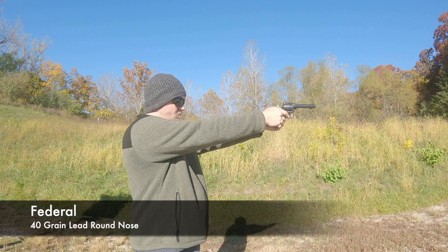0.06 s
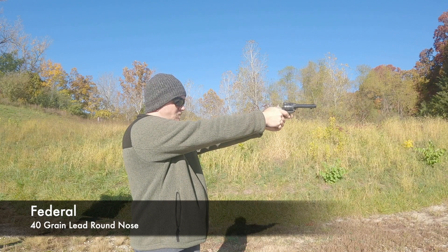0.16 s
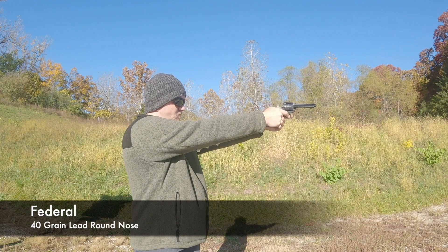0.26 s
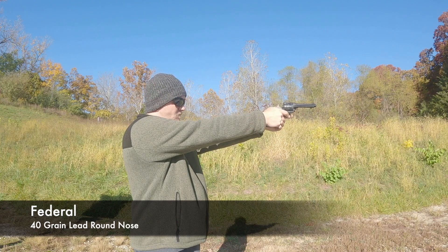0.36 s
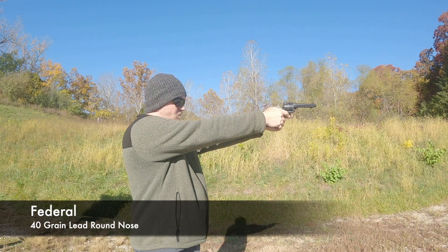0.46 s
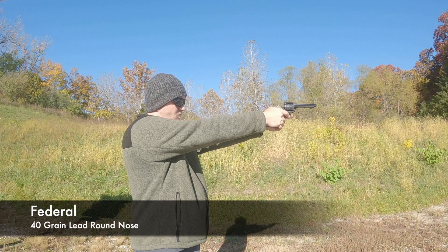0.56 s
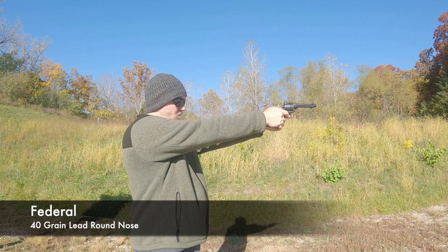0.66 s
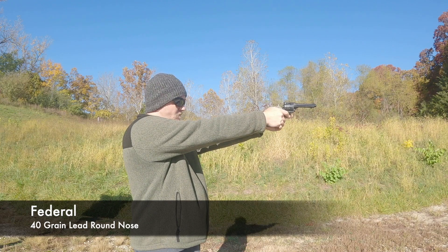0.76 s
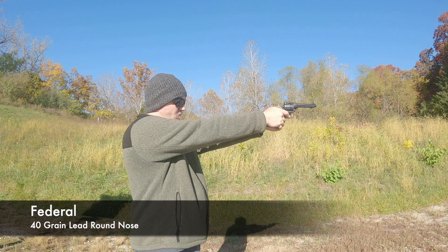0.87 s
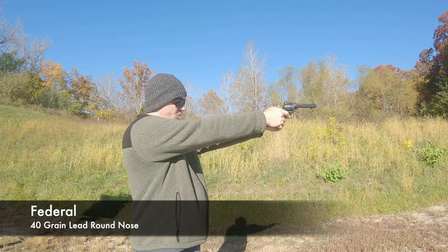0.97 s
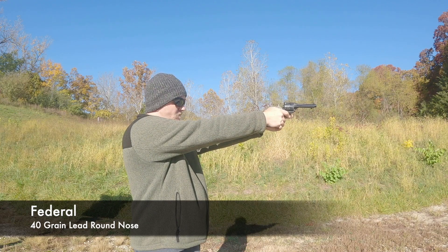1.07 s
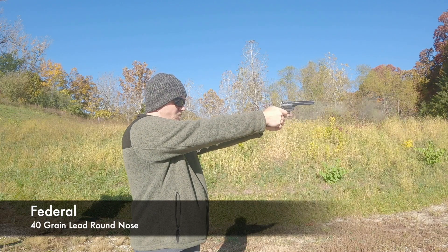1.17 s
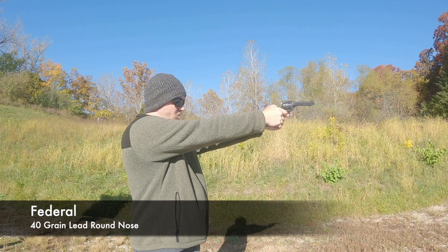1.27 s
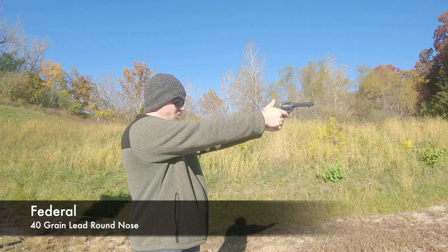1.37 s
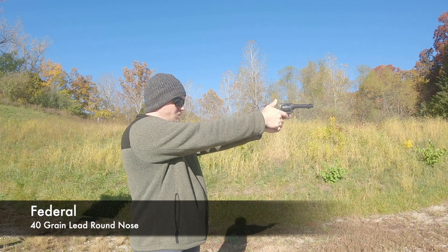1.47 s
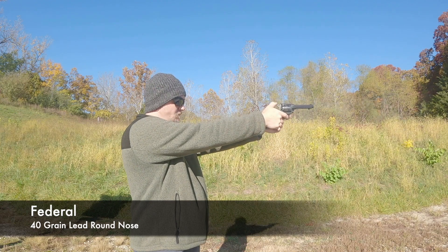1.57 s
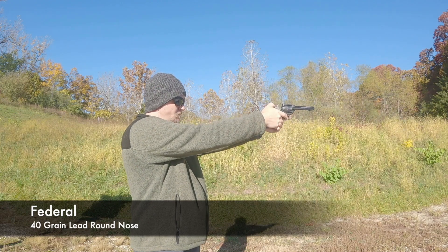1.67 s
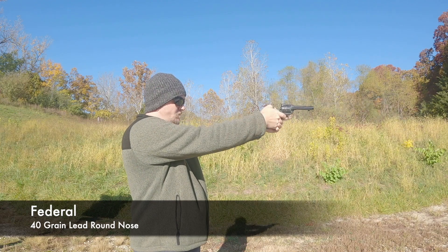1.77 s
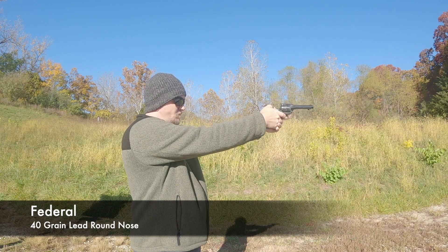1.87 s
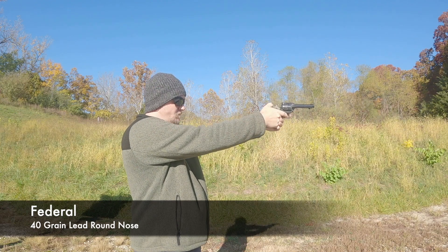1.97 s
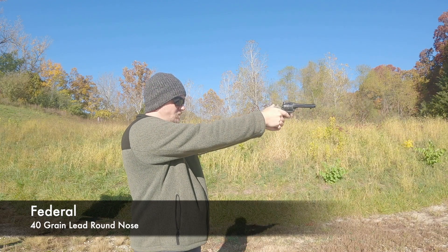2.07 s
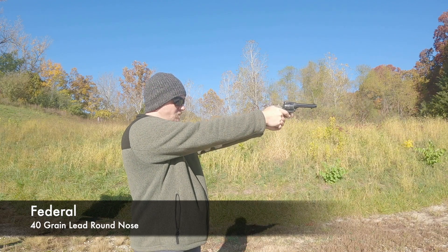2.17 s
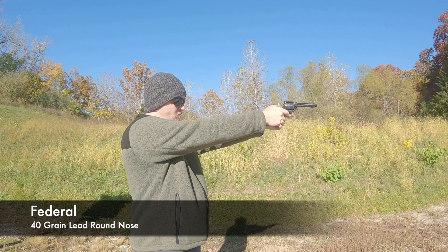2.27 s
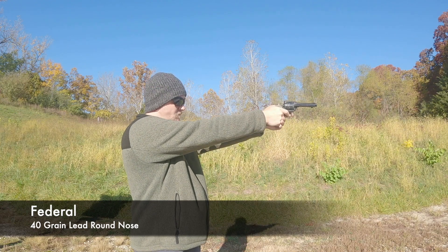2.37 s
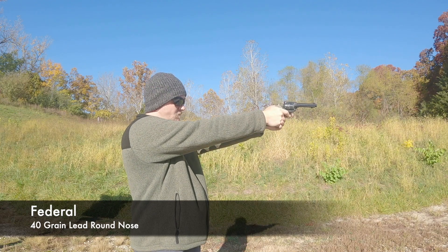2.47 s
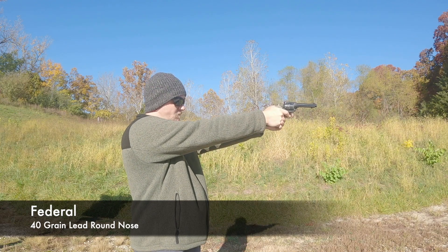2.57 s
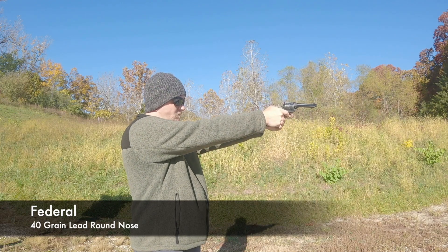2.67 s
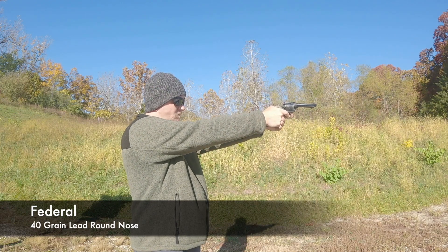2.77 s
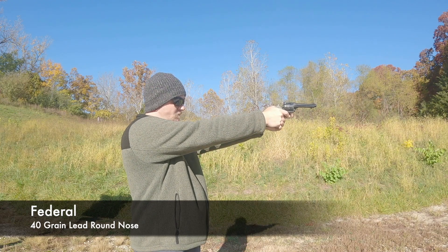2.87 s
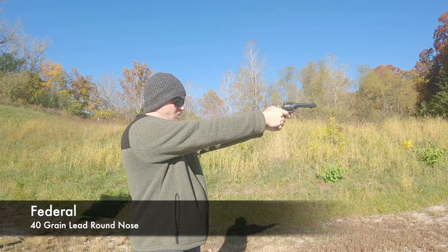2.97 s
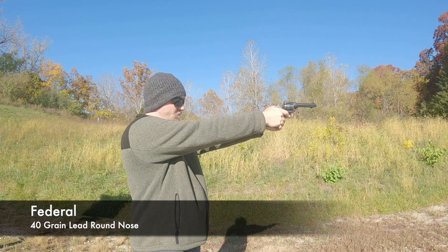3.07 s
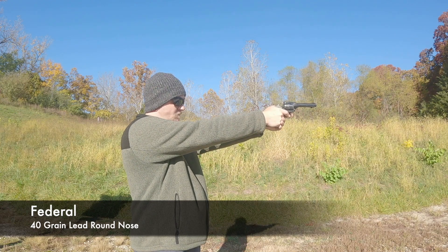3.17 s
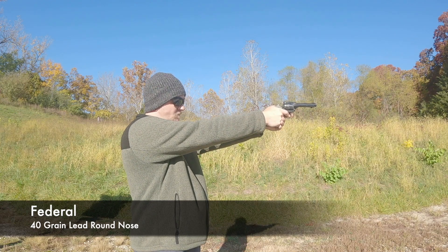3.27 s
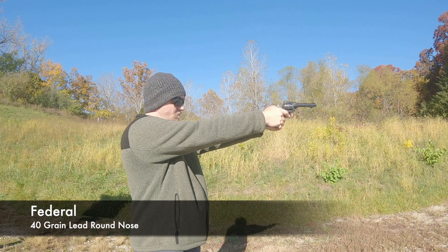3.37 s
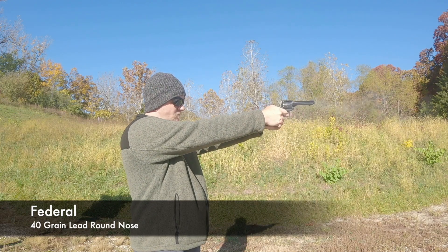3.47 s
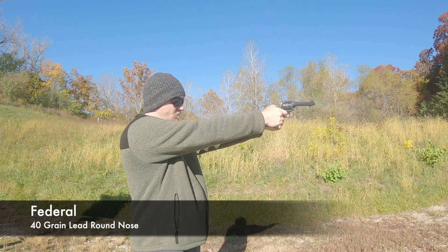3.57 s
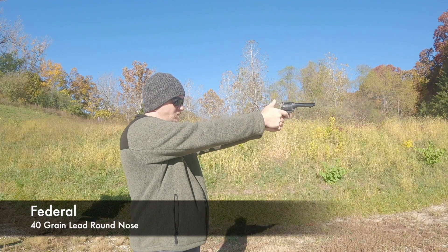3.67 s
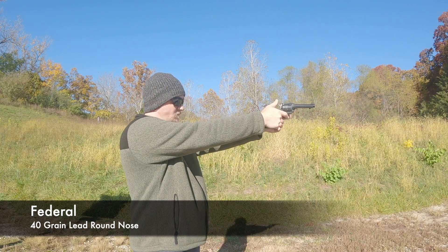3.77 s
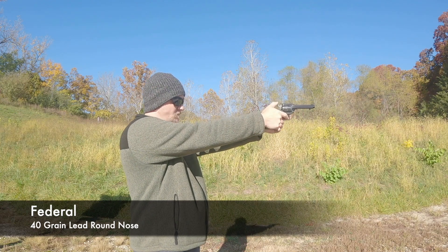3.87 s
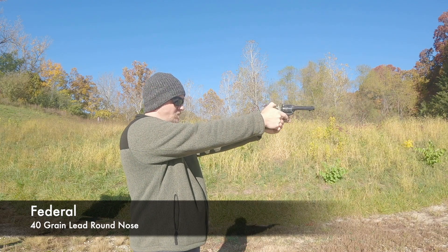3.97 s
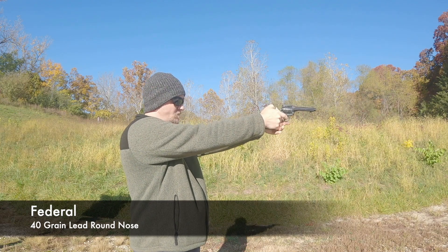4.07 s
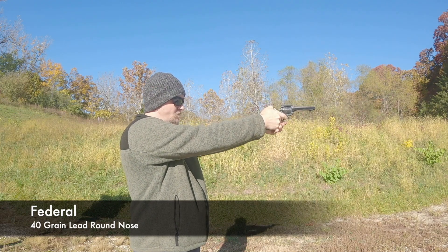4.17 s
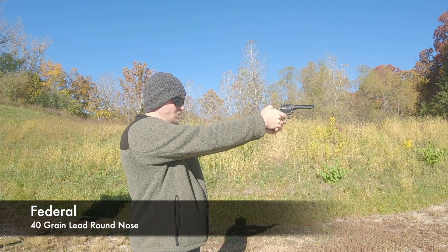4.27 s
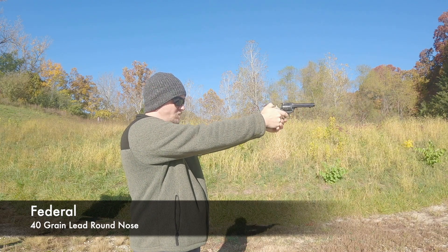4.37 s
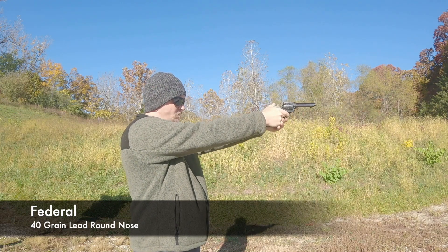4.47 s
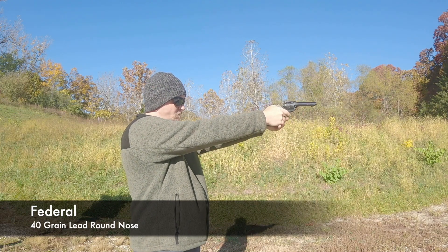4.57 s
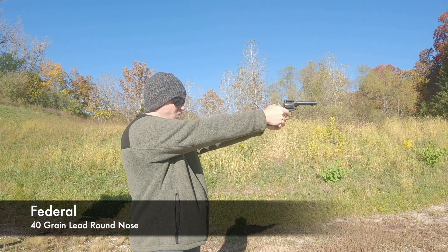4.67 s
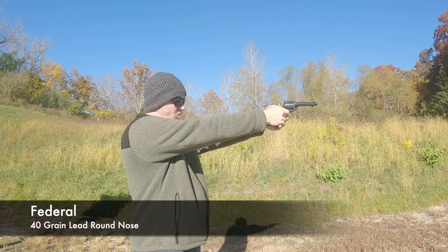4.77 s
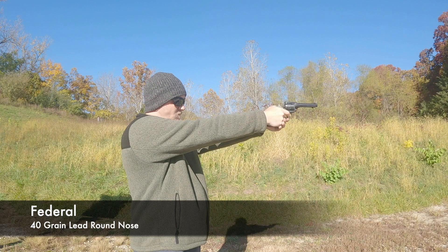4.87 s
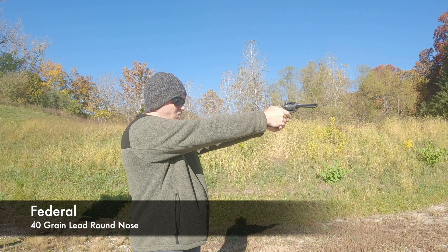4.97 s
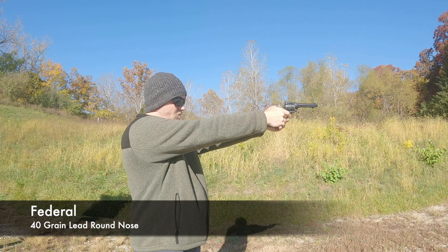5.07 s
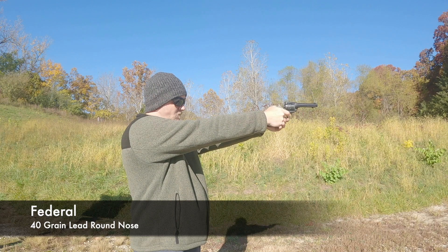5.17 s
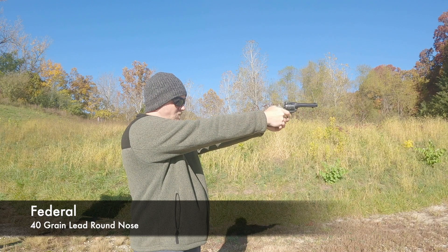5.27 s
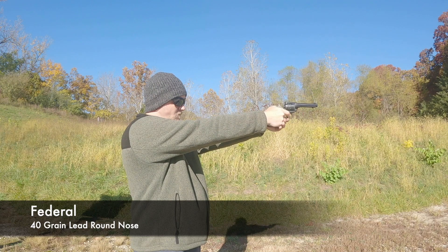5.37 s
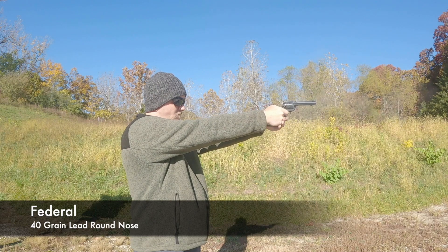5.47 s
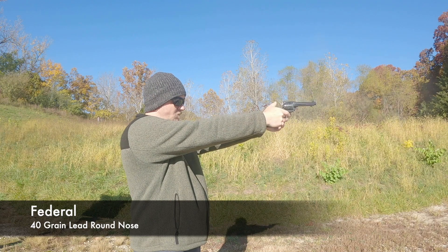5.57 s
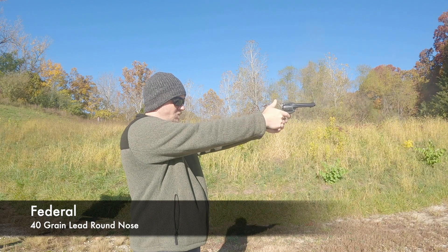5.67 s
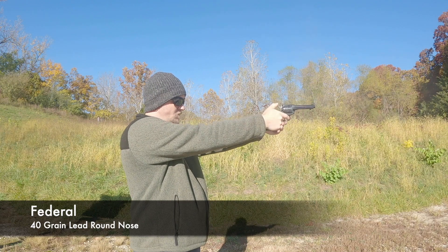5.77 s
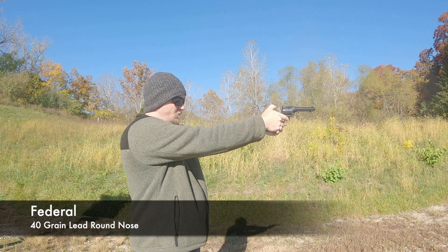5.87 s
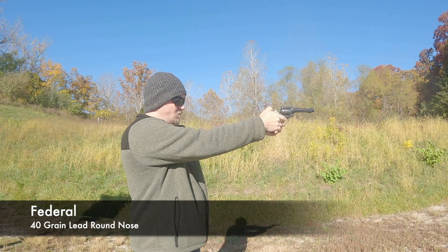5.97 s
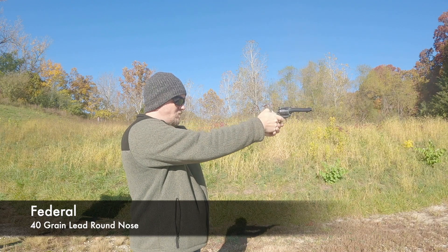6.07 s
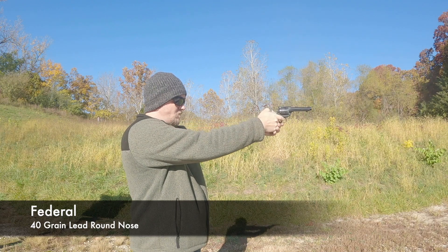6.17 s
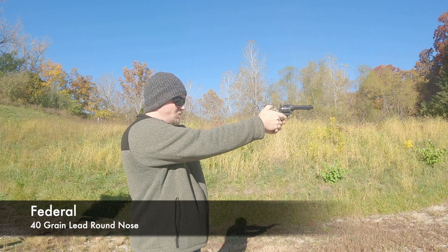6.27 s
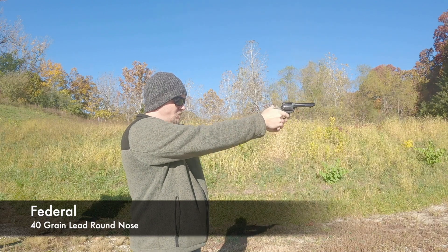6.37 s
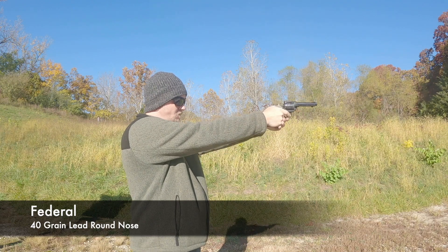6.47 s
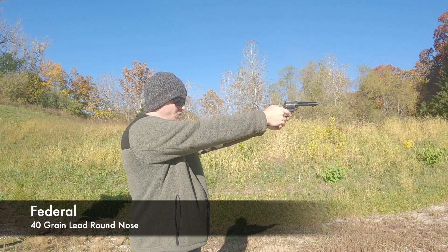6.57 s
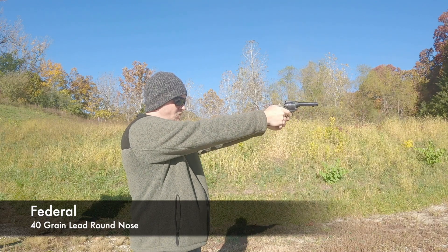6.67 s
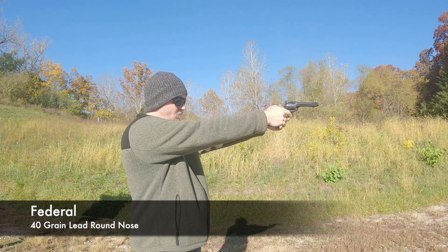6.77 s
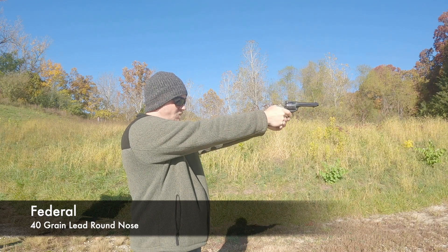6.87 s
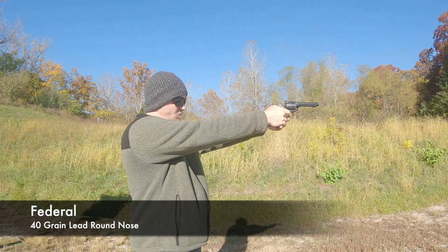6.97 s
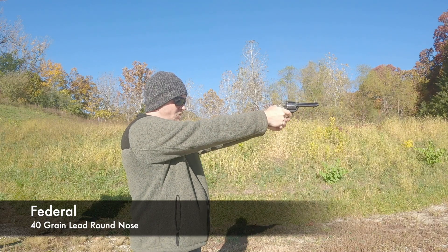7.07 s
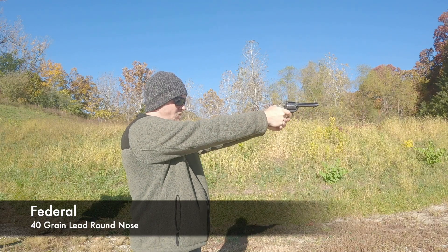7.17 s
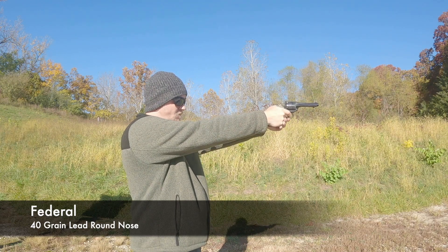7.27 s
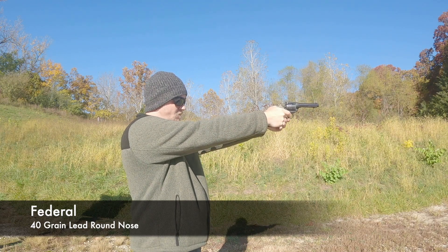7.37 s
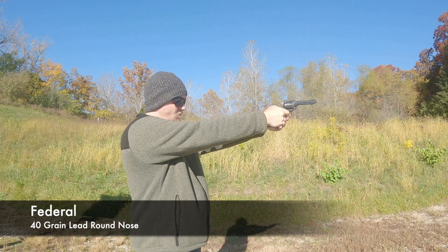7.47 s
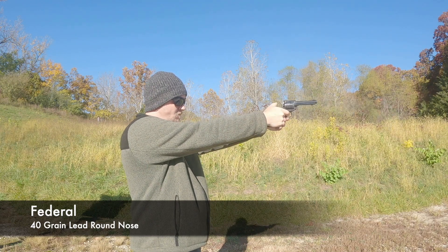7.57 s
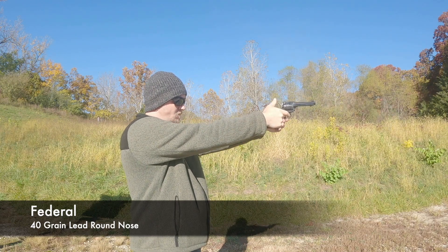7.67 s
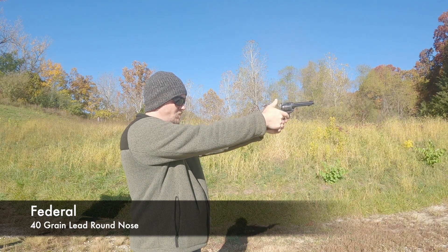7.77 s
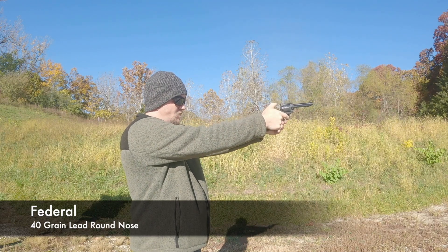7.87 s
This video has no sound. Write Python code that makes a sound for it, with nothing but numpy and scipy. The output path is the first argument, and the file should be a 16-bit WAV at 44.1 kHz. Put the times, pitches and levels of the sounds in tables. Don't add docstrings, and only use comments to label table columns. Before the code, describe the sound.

Close phone pickup in an open meadow, with an earth bank and tree line beyond. At 0 s an earlier shot's echo is dying away beneath faint high cricket whistles, soft rustle and distant traffic hum. Small-revolver blasts hit at 1.2, 3.5, 5.5 and 7.5 s: very loud, short, clipped cracks with a brief low boom and a gritty smear just before each. About 0.14 s later comes a bank slap and bullet strike, mostly a dull thump after the second shot and sharpest after the third. Tree echo swells around a quarter second after each blast, then rolls away, losing treble. Tiny steel cocking clicks come at 1.6-2.0, 4.0-4.4 and 5.9-6.3 s, with a faint one near 7.9. Crickets trill most around 3.5 s; a high buzz rises near 5.5 and 7.4 s. The final echo is cut off around 7.9 s.

```python
import sys
import numpy as np
from scipy import signal
from scipy.fft import rfft, irfft, next_fast_len
from scipy.io import wavfile
from scipy.ndimage import uniform_filter1d, map_coordinates

SR = 44100
rng = np.random.default_rng(int(sys.argv[2]) if len(sys.argv) > 2 else 0)


def unload_wav(signal):
    wavfile.write(
        sys.argv[1],
        SR,
        np.round(np.clip(np.atleast_2d(signal).T, -1, 1) * 32767).astype(np.int16),
    )


def linear_from_db(decibels):
    return 10 ** (np.asarray(decibels, float) / 20)


N = 348831


def unit(x):
    return x / np.sqrt(np.mean(x ** 2) + 1e-20)


def along(points, hz):
    f, v = np.transpose(points)
    return np.interp(np.log(hz + 1), np.log(f + 1), v)


def filtered(x, response):
    m = next_fast_len(x.shape[-1] + 8192)
    return irfft(rfft(x, m) * response(np.fft.rfftfreq(m, 1 / SR)), m)[..., :x.shape[-1]]


def ring(t, hz, t60, attack):
    t = np.maximum(t, 0)
    return np.sin(2 * np.pi * hz * t) * linear_from_db(-60 * t / t60) * (1 - np.exp(-t / attack))


def add(track, sound, s):
    at = round(s * SR)
    part = sound[max(-at, 0):max(len(track) - at, 0)]
    track[max(at, 0):][:len(part)] += part


def wobble(rate):
    knots = rng.standard_normal(int(N * rate / SR) + 4)
    return map_coordinates(knots, [np.arange(N) * rate / SR])


# (pitch [Hz], density [dB per Hz])
AIR_TONE = [(60, -44), (110, -31.5), (167, -11), (291, -13.5), (400, -5), (688, -1), (1350, -9),
            (2500, -16.5), (4850, -29), (6500, -29.5), (8000, -32), (8500, -52.5), (10900, -45),
            (15500, -60.5)]


def air():
    hum = filtered(rng.standard_normal(N), lambda hz: linear_from_db(along(AIR_TONE, hz)))
    return linear_from_db(-59 + 0.74 * wobble(3)) * unit(hum)


# (start [s], end [s])
WHISTLE_TIMES = [(-.15, .495), (.45, .76), (.68, 1.02), (.97, 1.2), (2.47, 2.98), (2.95, 3.3), (3.25, 3.46),
                 (4.26, 4.81), (4.8, 5.2), (4.86, 5.17), (5.3, 5.44), (6.78, 7.09)]
# (pitch [Hz], scoop from below [Hz], level [dB])
WHISTLE_NOTES = [(7200, 20, -75), (7300, 350, -75), (7230, 500, -71.5), (7150, 560, -68), (7340, 400, -72),
                 (7280, 950, -70), (7060, 500, -69.5), (7150, 120, -78.5), (7140, 90, -68),
                 (7550, 400, -75), (7150, 350, -73), (7400, 900, -75)]


def whistles():
    settle, sag_hz_per_s = 0.31, 350
    hook_hz, hook_s = 300, .015
    swell_db, swell_share = 14, 0.49
    out = np.zeros(N)
    flutter, waver = linear_from_db(3.0 * wobble(60)), 14 * wobble(120)
    for (start, end), (hz, scoop, db) in zip(WHISTLE_TIMES, WHISTLE_NOTES):
        length = end - start
        u = np.arange(round(length * SR)) / SR
        hook = hook_hz * np.exp((u - length) / hook_s) * (scoop < 100)
        pitch = hz - scoop * np.exp(-u / (settle * length)) - sag_hz_per_s * u - hook
        pitch = pitch + waver[round(abs(start) * SR):][:len(u)]
        level_db = db - swell_db * np.clip(1 - u / (swell_share * length), 0, 1)
        edge = np.clip(np.minimum(u, length - u) / .012, 0, 1)
        note = np.sin(2 * np.pi * np.cumsum(pitch) / SR)
        add(out, np.sqrt(2) * edge * linear_from_db(level_db) * note, start)
    t = np.arange(SR // 4) / SR
    tail = rng.standard_normal(SR // 4) * linear_from_db(-60 * t / .3)
    blur = signal.fftconvolve(out * unit(wobble(500)), tail / np.linalg.norm(tail))[:N]
    return out * flutter + linear_from_db(-5) * blur


# (time [s], level [dB])
TRILL_LEVEL = [(0, -95), (1.1, -80), (2.0, -85), (3.45, -74.5), (4.3, -85), (4.6, -84.5), (6.3, -95.5),
               (7.4, -85)]
# (time [s], level [dB])
BUZZ_LEVEL = [(0, -103), (2.2, -107), (4.3, -104), (5.45, -82.5), (6.3, -95.5), (7.4, -79.5), (7.91, -86.5)]


def crickets():
    trill_hz, trill_at_s = 27.37, 2.417
    t = np.arange(N) / SR
    chirps = np.exp(3.5 * (np.cos(2 * np.pi * trill_hz * (t - trill_at_s)) - 1)) * linear_from_db(3.5 * wobble(10))
    teeth = 1 + .7 * np.cos(2 * np.pi * 300 * t)
    wing = np.sin(2 * np.pi * np.cumsum(7500 + 75 * wobble(300)) / SR)

    def bands(hz):
        main = np.exp(-((hz - 11200) / 600) ** 2)
        upper = .4 * np.exp(-((hz - 12700) / 400) ** 2)
        return main + upper + .25 * np.exp(-((hz - 9600) / 600) ** 2)

    buzz = filtered(rng.standard_normal(N), bands)
    trill_db = np.interp(t, *np.transpose(TRILL_LEVEL))
    buzz_db = np.interp(t, *np.transpose(BUZZ_LEVEL))
    song = whistles() + linear_from_db(trill_db) * unit(chirps * teeth * wing)
    return song, linear_from_db(buzz_db + 2 * wobble(25)) * unit(buzz)


# (pitch [Hz], density [dB per Hz])
TREE_TONE = [(110, -52.5), (166, -27.5), (252, -12), (382, -4), (635, -2.5), (850, -5), (1400, -6),
             (3400, -6.5), (4500, -12.5), (7170, -22.5), (8600, -34.5), (9500, -41.5), (11500, -46),
             (14500, -62)]


def foliage(noise, share):
    return filtered(noise, lambda hz: np.sqrt(share(hz)) * linear_from_db(along(TREE_TONE, hz)))


# (delay [s], level [dB], swell [dB/s], fade [dB/s], bass [dB])
BELTS = [(.02, -10, 600.5, 351.5, 10), (.07, -26.5, 198, 25, 18), (.16, -14, 400, 31.5, 9),
         (.215, -4.5, 200, 47, -5), (.27, 1.5, 151.5, 63, -6), (.5, -8.5, 50.5, 18.5, -8.5),
         (1.05, -15, 18.5, 18, -12.5)]
# (full below [Hz], gone above [Hz])
BELT_BASS = (220, 650)


def landscape(noise):
    air_loss_db, loss_slope = 4.5, 1.15
    tree_line_s, ragged_db = 0.23, 1.92
    hz, t, z = signal.stft(noise, SR, nperseg=256)
    full, gone = BELT_BASS
    bass = np.clip(np.log(gone / (hz + 1)) / np.log(gone / full), 0, 1.3)[:, None]
    power = 0
    for at, db, swell, fall, bass_db in BELTS:
        drop_db = np.maximum(swell * (at - t), fall * (t - at))
        power = power + linear_from_db(db + bass_db * bass - drop_db) ** 2
    loss_db = air_loss_db * (np.minimum(hz, 7000)[:, None] / 1000) ** loss_slope * (t - tree_line_s)
    fade = np.interp(t, [.008, .02, 1.8, 2.3], [0, 1, 1, 0])
    clumps = uniform_filter1d(rng.standard_normal(z.shape), size=5, axis=0)
    ragged = unit(uniform_filter1d(clumps, size=12, axis=1))
    z = z * np.sqrt(power) * linear_from_db(ragged_db * ragged - loss_db) * fade
    return signal.istft(z, SR, nperseg=256)[1][:len(noise)]


# (delay [s], level [dB], pitch [Hz])
BANKS = [(.05, -52, 300), (.085, -37.5, 300), (.135, -44, 330), (.17, -42.5, 130.7), (.184, -32, 324.6),
         (.222, -33.5, 550), (.26, -23.5, 642), (.354, -26.5, 835), (.455, -31, 750), (.51, -38.5, 490),
         (.633, -43, 608), (.741, -40.5, 536), (.782, -44, 490), (.845, -39.5, 550), (1.011, -38.5, 590),
         (1.037, -41, 640), (1.078, -39.5, 550), (1.159, -42, 656), (1.201, -42.5, 586)]


def banks(length):
    out, t = np.zeros(length), np.arange(SR // 20) / SR
    mounds = [(0.32 + u, -52.5 - 27 * u + 4 * (v - .5), 298 * (0.84 + 0.4 * v))
              for u, v in rng.random((14, 2))]
    for delay, db, hz in BANKS + mounds:
        add(out, linear_from_db(db + 12.5) * ring(t, hz, 9 / hz, 1.0 / hz), delay - .004)
    return filtered(out, lambda hz: hz ** 4 / (hz ** 4 + 115 ** 4))


# (time to blast [s], level [dB])
EARLY = [(-.043, -35), (-.032, -23), (-.021, -9), (-.011, -5), (-.001, -5), (.001, -30)]


def smear(x):
    block, out = 512 / 48000, np.zeros(SR // 16)
    t = np.arange(len(out)) / SR - 4 * block
    for k in range(4):
        add(out, (-1) ** k * x, k * block)
    lift = 1 + 1.4 * np.clip(((t / block) % 1 - .26) / 0.033, 0, 1)
    grit = filtered(rng.standard_normal(len(t)), lambda hz: (
        0.59 / np.sqrt(1 + (hz / 900) ** 2) + 0.52 * np.exp(-((hz - 8800) / 400) ** 2)))
    bass = filtered(out, lambda hz: 1 / (1 + (hz / 1100) ** 4))
    fade = linear_from_db(np.interp(t, *np.transpose(EARLY), right=-120))
    copies = (out + bass * (lift - 1) + grit) * fade
    lead = 64
    dull = filtered(np.pad(copies, lead), lambda hz: (
        1 / np.sqrt(1 + (hz / 5400) ** 14) + linear_from_db(-19.5) / (1 + (hz / 14000) ** 6)))
    return dull, 4 * block + lead / SR


# (delay [ms], strength, ring [Hz], t60 [ms])
FRONTS = [(0, 3.2, 3000, 1.2), (.33, -2, 4305, 1.3), (.54, 2.5, 1900, 1.1), (.82, -1.24, 4700, 2.2),
          (1.2, 0.5, 1880, 2), (1.56, -1.77, 1650, 3), (2.5, 1.0, 1600, 1.8)]
# (delay [ms], strength, pitch [Hz], t60 [ms])
BOOM = [(3.75, .28, 325, 30), (1.8, 0.083, 95, 37), (4.2, 0.1, 180, 40), (3.2, 0.16, 600, 26),
        (5.62, 0.14, 880, 38)]


def blast(level_db):
    ms = np.arange(SR // 16) / SR * 1000
    x = np.zeros(len(ms))
    for at, strength, hz, t60 in FRONTS:
        late = rng.normal(0, .015)
        x += strength * linear_from_db(rng.normal(0, 1.5)) * ring(ms - at - late, hz / 1000, t60, .01)
    for at, strength, hz, t60 in BOOM:
        x += strength * linear_from_db(rng.normal(0, .7)) * ring(ms - at, hz / 1000, t60, .4)
    gas = filtered(rng.standard_normal(len(ms)), lambda hz: 1 / (1 + (hz / 5000) ** 2) + .04)
    x += gas * (0.58 * (ms < 2.9) * linear_from_db(-3 * ms) + 0.45 * linear_from_db(-60 * ms / 32))
    x *= linear_from_db(level_db)
    clipped = x / (1 + np.abs(x) ** 4) ** (1 / 4)
    return 1.156 * filtered(clipped, lambda hz: 1 / np.sqrt(1 + (hz / 7500) ** 4))


# (time [s], blast level [dB], echo level [dB])
SHOTS = [
    (-.85, -2, -2),
    (1.2281, 0, 0),
    (3.5092, 0, 0),
    (5.4798, 0, 0),
    (7.5044, 0, 1),
]
# (delay [s], level [dB])
SLAP = [(.1285, -31), (.130, -24), (.1325, -26), (.135, -25)]


def shots():
    out, echo = np.zeros(N), np.zeros(N)
    length = round(2.3 * SR)

    def stir(hz):
        return np.clip(hz / 6000, .1, .9)

    lumps = linear_from_db(1.4 * wobble(70)[:length])
    lasting = foliage(unit(lumps) * rng.standard_normal(length), lambda hz: 1 - stir(hz))
    dull = banks(length)
    for s, blast_db, echo_db in SHOTS:
        bang = blast(blast_db)
        early, lead = smear(bang)
        add(out, bang, s)
        add(out, early, s - lead)
        front = filtered(np.pad(bang[:50], 40), lambda hz: 1 / np.sqrt(1 + (hz / 5000) ** 4))
        for delay, db in SLAP:
            add(out, linear_from_db(db) * front, s + delay - .001)
        stirred = foliage(rng.standard_normal(length), stir)
        trees = linear_from_db(-29.5) * landscape(unit(lasting + stirred))
        add(echo, linear_from_db(echo_db) * (trees + dull), s)
    return out, echo


# (time [s], peak level [dB], thump level [dB])
THUDS = [
    (1.3699, -22.5, -15),
    (3.6516, -40, 2),
    (5.6191, -14, -18),
    (7.6471, -23, -15.5),
]


def bullets():
    out, t = np.zeros(N), np.arange(SR // 20) / SR
    for s, db, thump_db in THUDS:
        burst = linear_from_db(-60 * t / .003) * rng.standard_normal(len(t))
        grit = filtered(burst, lambda hz: 1 / (1 + (hz / 5500) ** 4))
        crack = ring(t, 3290, 0.0054, .0001) + 0.9 * ring(t, 6000, 0.0026, .0001) + 0.73 * grit
        thump = linear_from_db(thump_db + 9.5) * ring(t - .001, 259, 0.022, .001)
        add(out, linear_from_db(db + 3.0) * (crack + thump), s + 0.00059)
    return out


# (pitch [Hz], t60 [s])
FRAME = [(2950, 0.007), (3550, 0.0055)]
PAWL = [(5500, 0.0056), (6400, .005), (7500, 0.0029)]
SEAR = [(10800, 0.0047), (9200, 0.0026), (13100, 0.0024)]
# (time [s], peak level [dB])
THUMB = [(1.6083, -38.5), (3.9588, -55), (5.8662, -38.5), (7.8845, -52)]
BOLT = [(1.6811, -36.5), (4.0099, -38), (5.9248, -39)]
TURN = [(1.735, -45), (4.0842, -53), (5.9967, -53)]
CATCH = [(1.82, -40), (4.2064, -38), (6.107, -40)]
TRIGGER = [(2.0118, -38.5), (4.4143, -40), (4.8492, -60.5), (6.2946, -39.5)]
# (clicks, frame level [dB], sear level [dB])
STEPS = [(THUMB, 8, -39), (BOLT, 5.1, -20), (TURN, 1.6, -15), (CATCH, 14, -9), (TRIGGER, -1.5, -24)]


def action():
    out, t = np.zeros(N), np.arange(SR // 40) / SR
    for clicks, frame_db, sear_db in STEPS:
        parts = (FRAME, frame_db + 2), (PAWL, 0), (SEAR, sear_db + 7.0)
        for s, db in clicks:
            for modes, part_db in parts:
                steel = np.zeros(len(t))
                for hz, t60 in modes:
                    strength, detune = linear_from_db(rng.normal(0, 1.3)), 1 + rng.normal(0, 0.022)
                    steel += strength * ring(t, hz * detune, t60, 0.0006)
                add(out, linear_from_db(db + part_db + 8) * steel, s + 0.00081)
    return out


# (pitch [Hz], level [dB])
PORTS = [(1000, -59), (2500, -31.5), (5000, -26.5), (10000, -13.5), (15000, -9.5)]


def scene():
    gun, echo = shots()
    song, buzz = crickets()
    near = gun + bullets() + action() + buzz
    mid = near + echo + song + air()
    scatter = rng.standard_normal(size=48)
    scattered = np.convolve(near + linear_from_db(-21) * echo, scatter / np.linalg.norm(scatter))[:N]
    side = filtered(scattered, lambda hz: linear_from_db(along(PORTS, hz)))
    return np.array([mid + side, mid - side])


def low_pass(x):
    return signal.sosfilt(signal.butter(12, 15690, fs=SR, output="sos"), x)


def record(dry):
    def response(hz):
        gap = 1 - .8 * np.exp(-((hz - 9095) / 130) ** 2)
        bass_cut = (linear_from_db(-20) + hz ** 3 / np.sqrt(110 ** 6 + hz ** 6)) / (1 + linear_from_db(-15.5))
        return (hz < 15800) * gap * bass_cut

    mix = np.clip(filtered(dry, response), -1, 1)
    return low_pass(mix)


dry = scene()
out = record(dry)
unload_wav(out)
```